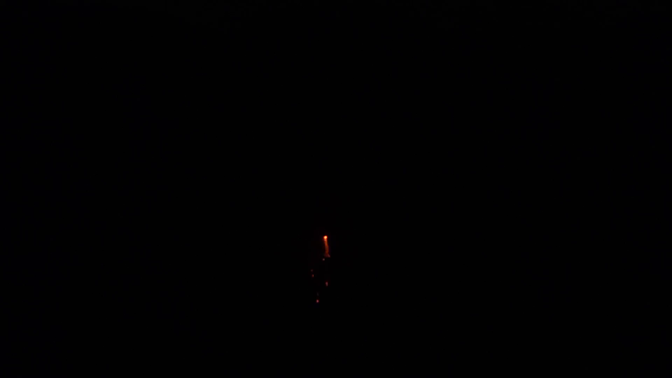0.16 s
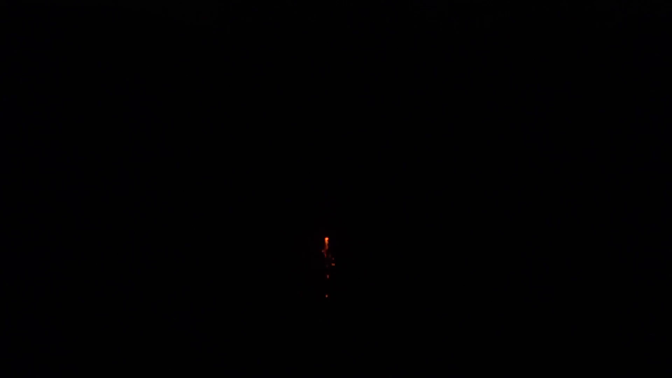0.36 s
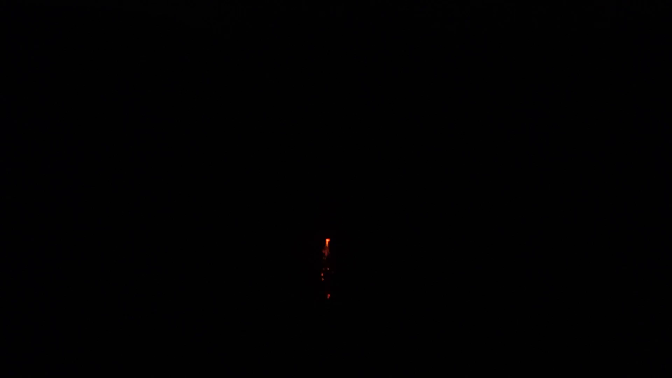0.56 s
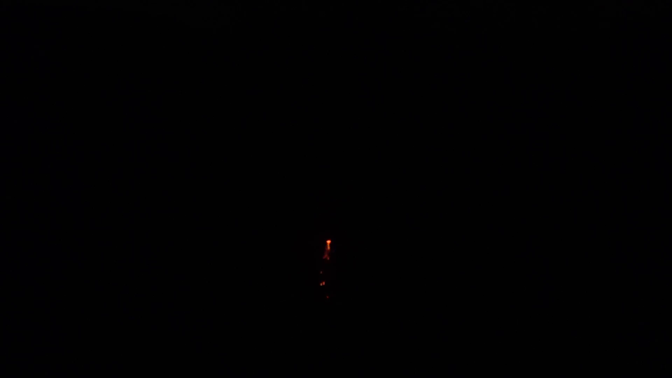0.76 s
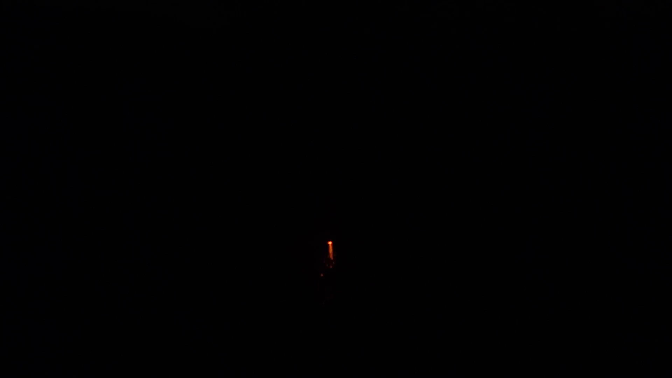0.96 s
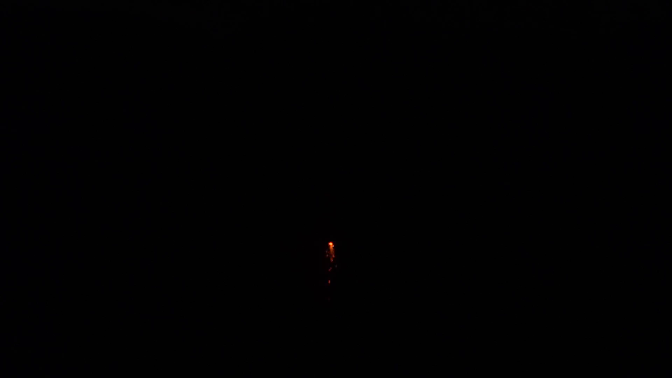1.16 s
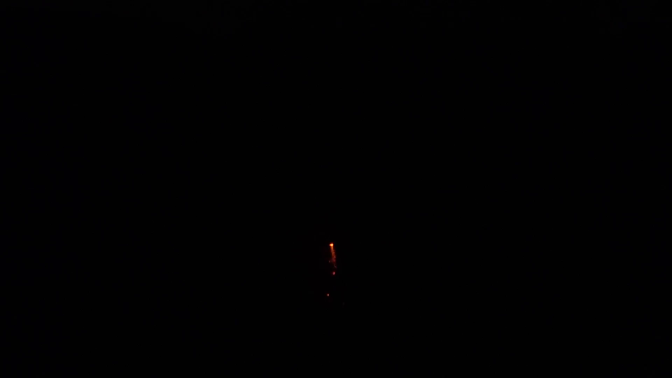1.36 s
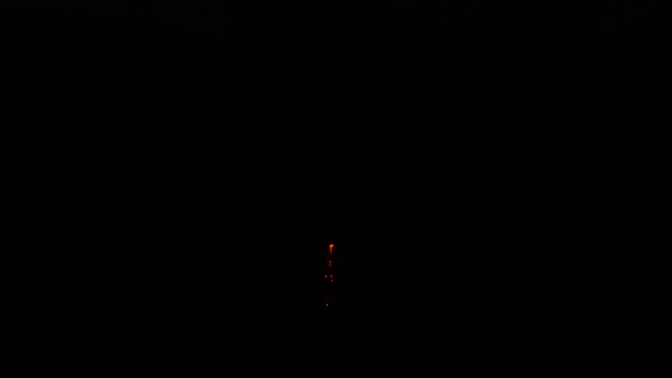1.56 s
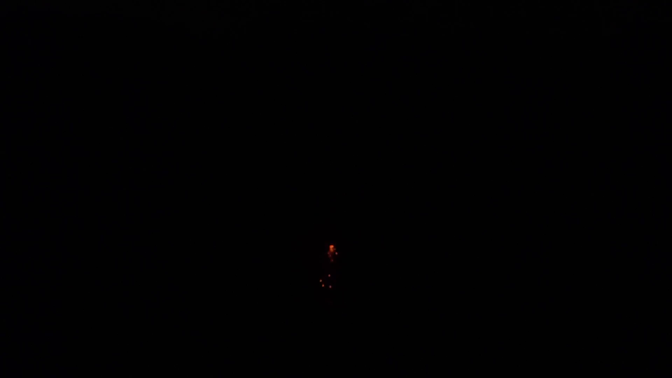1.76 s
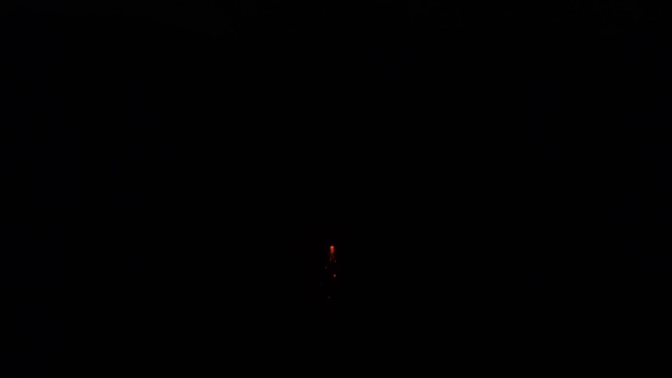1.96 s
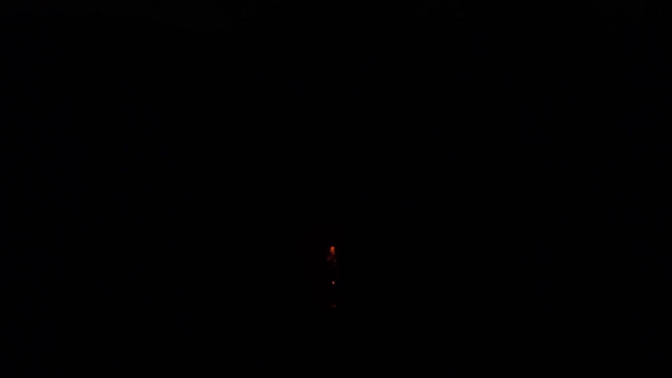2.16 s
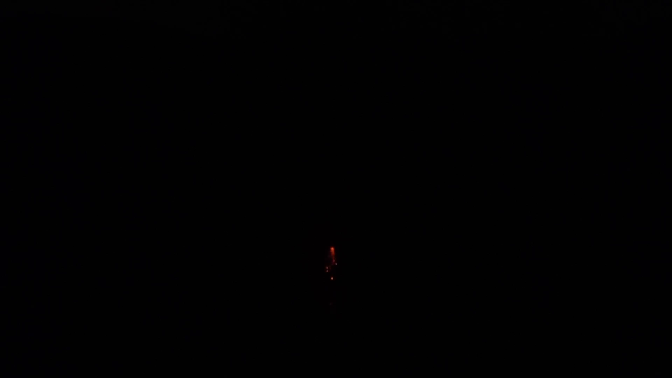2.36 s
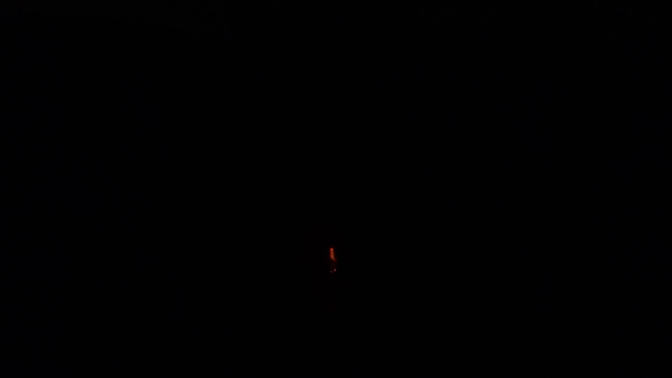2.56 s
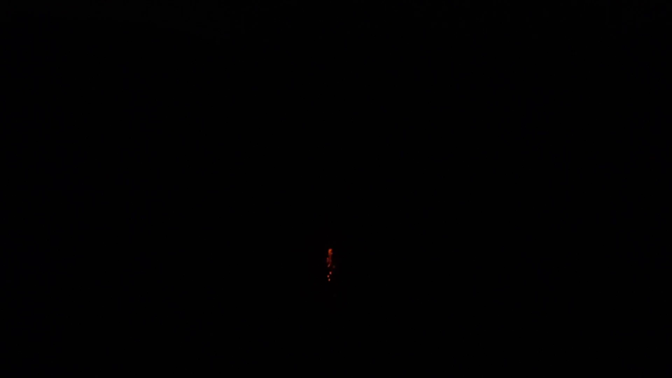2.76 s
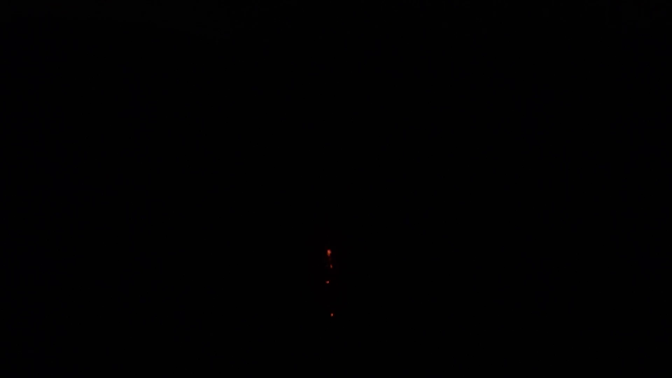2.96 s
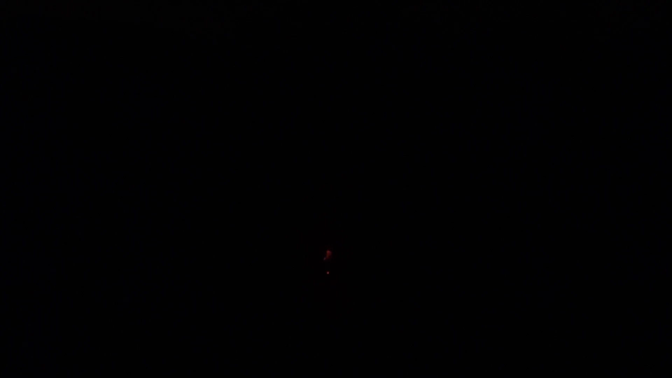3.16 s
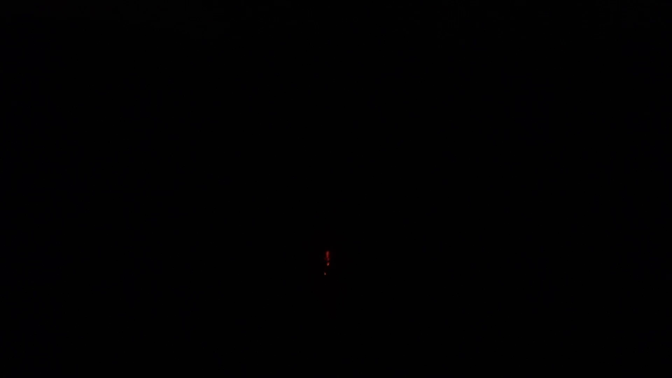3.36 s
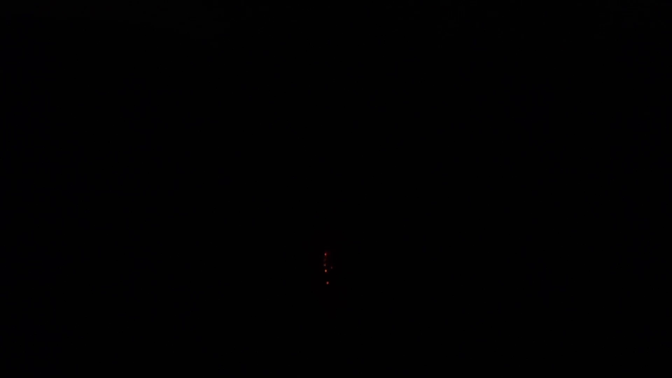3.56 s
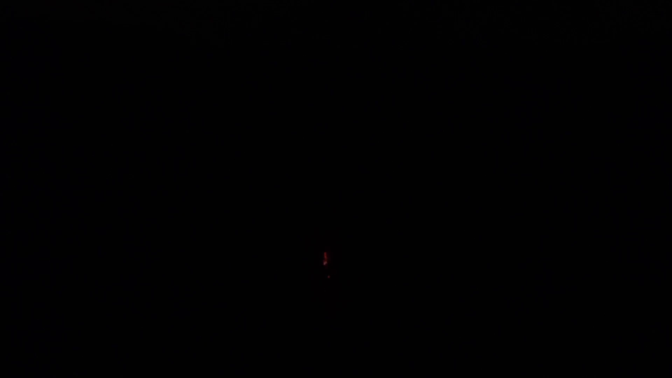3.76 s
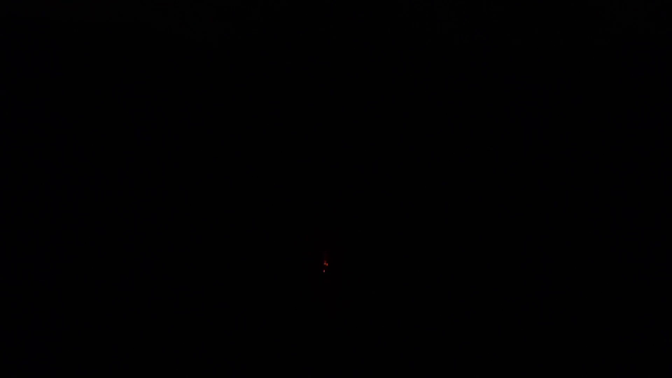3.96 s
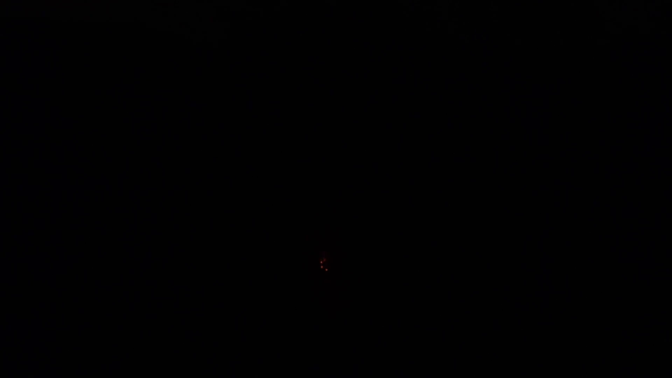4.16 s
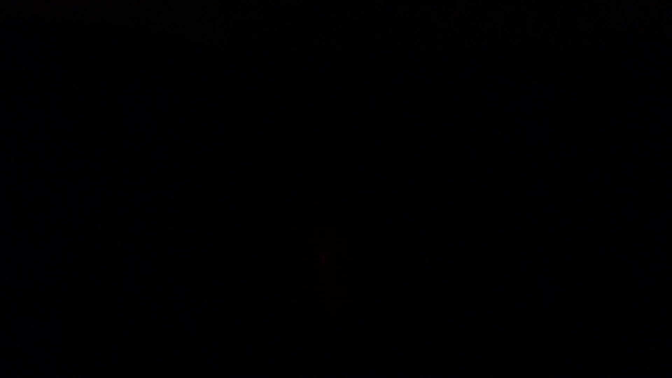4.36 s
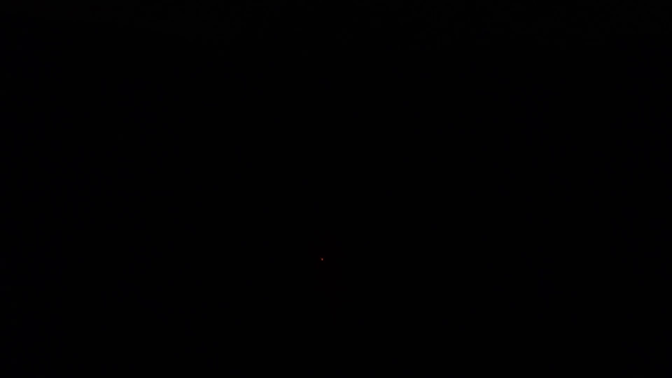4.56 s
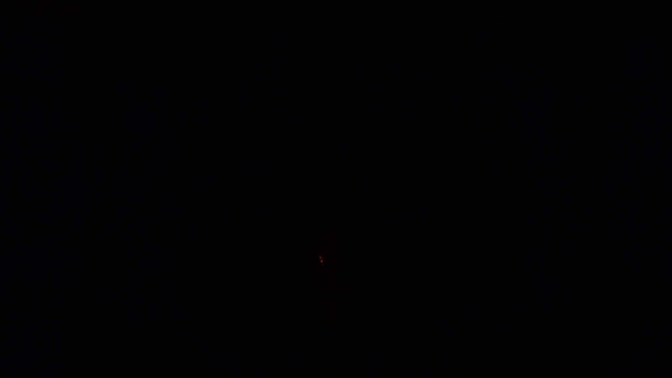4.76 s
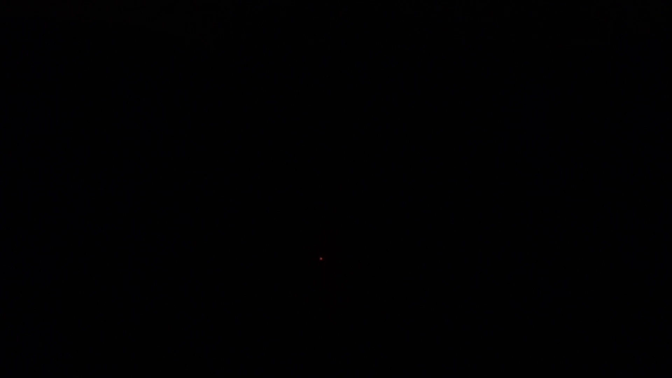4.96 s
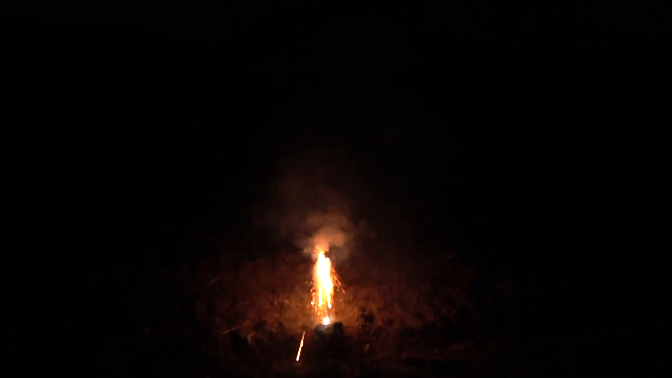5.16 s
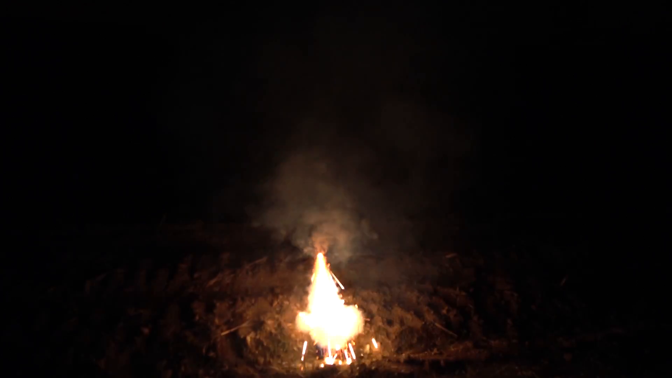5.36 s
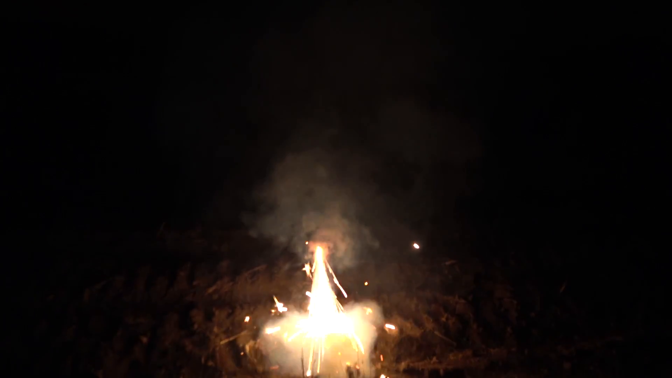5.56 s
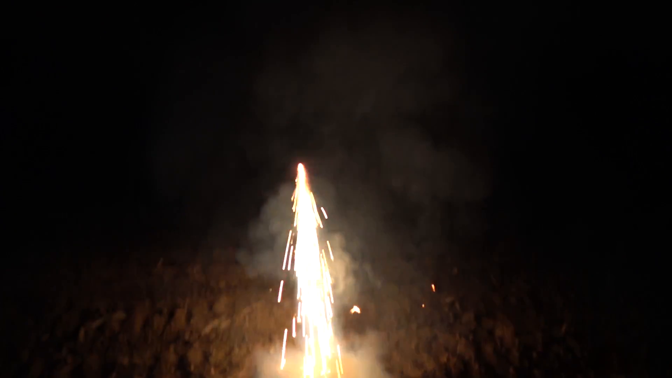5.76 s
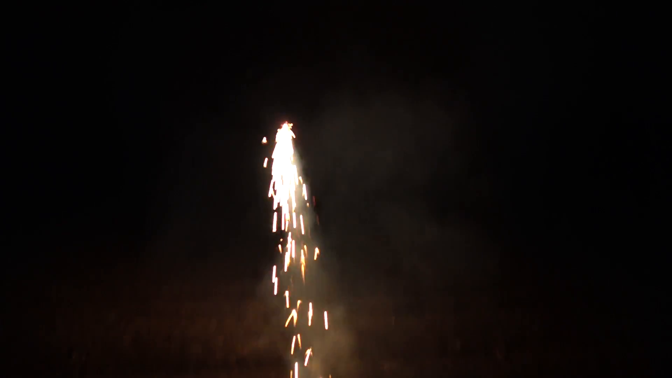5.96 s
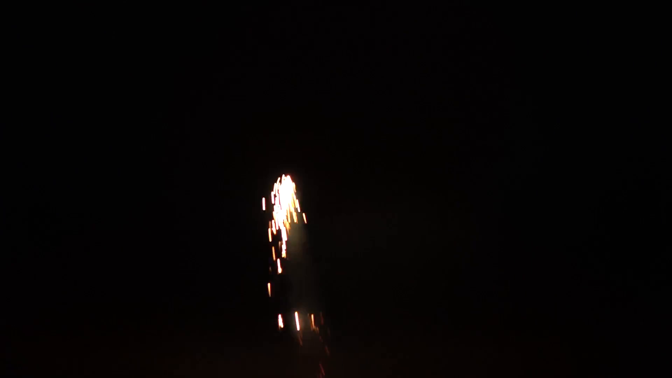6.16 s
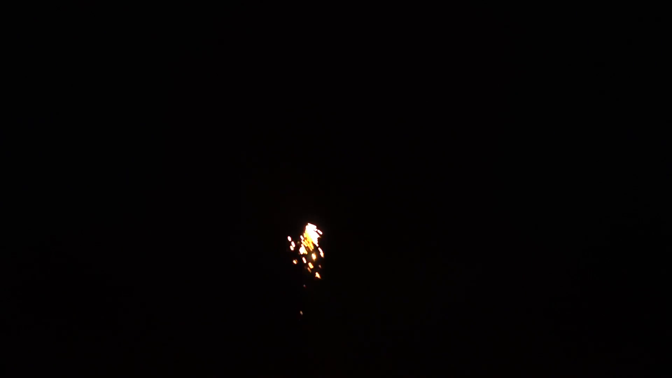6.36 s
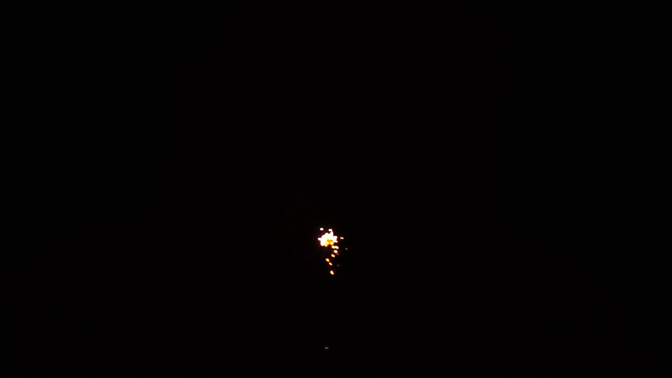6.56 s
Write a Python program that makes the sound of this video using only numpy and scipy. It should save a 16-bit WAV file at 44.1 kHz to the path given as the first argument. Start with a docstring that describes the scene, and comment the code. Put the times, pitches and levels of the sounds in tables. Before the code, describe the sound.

On open ground, almost straight in front of the microphone, a burning fuse gives a quiet, flickering hiss and spits a few times while the air rumbles faintly. Then a whistling rocket ignites with a quick thump and chirp. A short sputter turns into a much louder, piercing whistle that slides down in pitch over a sizzling, rushing jet, its top end dulling as the rocket draws away.

```python
"""A whistling rocket on open ground at night, nearly straight ahead of a stereo microphone.
Its fuse hisses and spits over a low rumble of air; the charge catches with a chirp and a squeal.
Pulsed burning drives the tube: it sputters, then locks into a shrill whistle that sinks as the tube
burns hollow. The rocket climbs away on a roaring jet, its echo off the ground trailing further behind."""
import sys
import numpy as np
from scipy import signal
from scipy.fft import rfft, irfft
from scipy.io import wavfile
from scipy.ndimage import uniform_filter1d

SR = 44100
rng = np.random.default_rng(int(sys.argv[2]) if len(sys.argv) > 2 else 0)


def store_pcm(level_fs):
    """Save levels as 16-bit WAV."""
    pcm = np.round(np.clip(level_fs, -1, 1) * 32767).astype(np.int16)
    wavfile.write(sys.argv[1], SR, np.atleast_2d(pcm).T)


N = 291508
T = np.arange(N) / SR

LAUNCH_S, LOCK_S, SETTLE_S = 5.2524, 5.37, .085  # the sputter starts, locks onto the tube, settles
AWAY_S, AWAY_LENGTH_S = 5.78, 0.33  # the rocket draws away from the microphone
BURST_HZ, BURST_WIDTH_HZ = 6900, 3600  # the crack of flaring powder
# treble in flight, shared by bursts and jet hiss: (time [s], level [dB])
TREBLE = [(5.256, -17.5), (5.275, -22), (5.37, -23), (5.47, -26), (5.58, -25.5), (5.70, -21.5),
          (5.80, -25.5), (5.88, -37), (6.61, -41.5)]


def whistle(tone_db=-0.1, burst_db=-0.66, waver_db=1.6, shimmer_db=3.5):
    """Pulsed burning drives the tube: a fluttering tone, half-pitch partials, bursts and turbulence."""
    # loudness of the tone: (time [s], level [dB])
    whistle_level = [(5.265, -25), (5.321, -30.5), (5.373, -20.5), (5.493, -15), (5.627, -13.5),
                     (5.961, -17), (5.987, -21), (6.035, -17), (6.61, -16)]
    # partials at 1/2, 3/2, ... of the pitch: (level against the half-pitch tone [dB])
    half_partials = [0, -2.5, -21, -10, -15]
    flutter, uneven_db, scatter, share = burning()
    # the period doubles for a while, and the tone is restless as that takes hold
    doubling_s, attack_s = 5.39, 0.1494
    half_db = -12.5 - 21 * (1 - swell(doubling_s, attack_s, end=6.02, release=0.087))
    flutter = flutter + .5 * np.sin(np.pi * ramp(doubling_s, attack_s) ** 2)
    # until it locks, the pitch stumbles from cycle to cycle
    stumble = .075 * (1 - ramp(LOCK_S - SETTLE_S / 2, SETTLE_S / 2)) * drift(260)
    wobble = .027 * flutter * drift(130)
    turns = np.cumsum(tube_pitch() * (1 + wobble + stumble)) / SR
    # the sharper the flares, the more the wave steepens into its octave
    main = tone(turns) + from_db(-21.5) * np.sqrt(share) * tone(2 * turns + 1 / 4)
    half = sum(from_db(half_db + db) * tone((k + .5) * turns) for k, db in enumerate(half_partials))
    level = from_db(in_time(whistle_level) + tone_db + shimmer_db * flutter * drift(180))
    voice = level * (main + over_ground(half, echo=0.2) * from_db(waver_db * drift(30)))
    cracks = bursts(turns, uneven_db, scatter, alternation=np.clip(4 * from_db(half_db), 0, 1))
    cracks *= from_db(in_time(TREBLE) + burst_db) * np.sqrt(share)
    return voice + over_ground(cracks, echo=0.35) + turbulence(turns)


def tube_pitch(lock_hz=2390, hollow_hz=1880, sink_s=.18, sag_hz_per_s=228):
    """High while the charge sputters; once locked, it sinks as the tube hollows and the rocket recedes."""
    sputter_hz = np.interp(T, [LAUNCH_S, LAUNCH_S + .055], [2380, 2670])
    burnt_s = np.maximum(T - LOCK_S, 0)
    tube_hz = hollow_hz + (lock_hz - hollow_hz) * np.exp(-burnt_s / sink_s) - sag_hz_per_s * burnt_s
    recede_m_per_s = 8.7 * ramp(5.72, .21)
    doppler = 1 + recede_m_per_s / 343
    return (sputter_hz + (tube_hz - sputter_hz) * ramp(LOCK_S, .007)) / doppler


def burning():
    """The sputter settles into steady pulsing, which blurs again with distance."""
    # manners of burning: (flutter [0-1], flare unevenness [dB], scatter [cycles], treble share [0-1])
    sputtering = (1.0, 14, .26, .98)
    locked = (.1, 3.0, .014, .8)
    distant = (.36, 5, .26, .13)
    fresh = np.exp(-np.maximum(T - LAUNCH_S, 0) / SETTLE_S)
    away = ramp(AWAY_S, AWAY_LENGTH_S)
    return np.outer(sputtering, fresh) + np.outer(locked, 1 - fresh - away) + np.outer(distant, away)


def bursts(turns, uneven_db, scatter, alternation):
    """The powder flares once a cycle, unevenly, and strong-weak in turn when the period doubles; rms 1."""
    cycle = np.arange(1, int(turns[-1]))
    timing, strength = rng.standard_normal((N // 8, 2))[:len(cycle)].T
    when = np.interp(cycle + scatter[np.searchsorted(turns, cycle)] * timing, turns, np.arange(N))
    at = np.minimum(when.astype(int), N - 2)
    size = from_db(uneven_db[at] * np.minimum(strength, 1)) * (1 + alternation[at] * (-1) ** cycle)
    # each click is split between two neighbouring samples
    clicks = np.bincount(at, size * (1 - when + at), N) + np.bincount(at + 1, size * (when - at), N)
    cracks = resonate(clicks, BURST_HZ, BURST_WIDTH_HZ)
    return cracks / np.sqrt(uniform_filter1d(cracks ** 2, size=1500) + 1e-12)


def turbulence(turns, near_db=-30, far_db=-24.5, air_loss_db=13):
    """Bands of noise ride on the tube's pitch; the air dulls the high ones as the rocket climbs."""
    # turbulence in the tube: (frequency [multiple of pitch], width [Hz], level [dB])
    bands = [(.5, 120, -27), (.86, 163, -4), (.97, 71, -7), (1.27, 570, -10.5), (1.48, 120, -19.5),
             (1.86, 170, -14), (2, 65, -11.5), (2.93, 500, -21), (3.5, 230, -19.5), (3.8, 247, -31),
             (4.56, 240, -22.5), (6.15, 467, -31), (7.1, 850, -26), (8.2, 850, -27)]
    phase, height = 2 * np.pi * turns, ramp(6.0, .6)
    churn = np.zeros(N)
    for multiple, width, db in bands:
        band = drift(width / 2) * np.cos(multiple * phase) + drift(width / 2) * np.sin(multiple * phase)
        churn += from_db(db - air_loss_db * height * (multiple / bands[-1][0]) ** 2) * band
    level = from_db(near_db + (far_db - near_db) * np.sqrt(ramp(AWAY_S, AWAY_LENGTH_S)))
    return level * signal.sosfilt(signal.butter(2, 350, "high", fs=SR, output="sos"), churn)


def exhaust(jet_db=-1.0, rasp_db=-2.5, top_loss_db_per_s=7):
    """The jet hisses, sizzles at lift-off and builds to a roar; distance takes its top away."""
    # spectra of the jet's hiss, sizzle and roar: (frequency [Hz], level [dB])
    jet_colour = [(900, -0.5), (2000, 4), (3000, 2.5), (4000, 0), (5000, -2), (6500, 1), (8500, -4),
                  (10500, -5.5), (12500, -6), (16000, -27)]
    sizzle_colour = [(9000, 5), (11500, -12), (13800, -3), (15200, -3), (16500, -9)]
    roar_colour = [(90, -33), (160, -12), (230, -2), (320, -0.5), (450, 1), (700, 0), (1000, -0.5),
                   (1500, -1.5), (3000, -9)]
    *_, burst_share = burning()
    sizzle_db = -14 + 14.5 * swell(5.43, attack=0.073, end=5.73, release=0.074)
    sizzle_db -= top_loss_db_per_s * np.maximum(T - AWAY_S, 0)
    hiss = from_db(jet_db) * noise(jet_colour) + from_db(sizzle_db) * noise(sizzle_colour)
    roar = (from_db(-56.5) + from_db(-33.5) * ramp(5.3, 0.28) ** 2) * noise(roar_colour)
    hiss *= np.sqrt(1 - burst_share) * from_db(in_time(TREBLE) + rasp_db * drift(750))
    return over_ground(hiss + roar, echo=0.47)


def over_ground(x, echo):
    """The ground echo sweeps a comb through the sound as the rocket climbs."""
    # lag of the ground echo at the microphone: (time [s], delay [s])
    echo_delay = [(5.3, 0.00052), (5.5, 0.00098), (5.76, .0018), (5.92, .00287), (6.03, .0034),
                  (6.2, .00355), (6.61, 0.0034)]
    return x + echo * np.interp(T - in_time(echo_delay), T, x)


def ignition(chirp_s=5.189, from_hz=2400, to_hz=638, fall_s=0.046, squeal_hz=5660):
    """Gas puffs out with a thump and a ragged falling chirp, then the tube's upper mode squeals."""
    # puffs as the charge catches: (peak [s], rush [dB], thump [dB], rise [s], decay [s])
    puffs = [(5.187, -22.5, -36, 0.016, .022), (5.222, -38, -32.5, .014, 0.024),
             (5.252, -16.5, -29, 0.0075, 0.0062)]
    # spectra of a puff's rush and thump: (frequency [Hz], level [dB])
    rush_colour = [(120, -46), (200, -24), (401, -11), (500, -7), (1100, -2), (1270, -8.5), (1840, -3),
                   (3020, -9.5), (3430, -8.5), (16000, -22)]
    thump_colour = [(20, 1), (45, -14), (90, 2.5), (170, 1.5), (300, -8), (600, -25)]
    # the first puff sounds the tube briefly
    chirp_hz = from_hz + (to_hz - from_hz) * ramp(chirp_s - fall_s / 2, fall_s) ** 2
    turns = np.cumsum(chirp_hz * (1 + .07 * drift(524))) / SR
    chirp = from_db(-16.5 + 3 * drift(454)) * (tone(turns) + from_db(-9) * tone(2 * turns))
    chirp *= puff(chirp_s, rise=0.0078, decay=.008)
    rush, thump = noise(rush_colour), noise(thump_colour)
    gas = sum(puff(s, rise, decay) * (from_db(rush_db) * rush + from_db(thump_db) * thump)
              for s, rush_db, thump_db, rise, decay in puffs)
    squeal = from_db(-8.5) * tone(np.cumsum(squeal_hz * (1 + .035 * drift(500))) / SR)
    return gas + chirp + squeal * during(LAUNCH_S, LAUNCH_S + 0.003)


def fuse(flicker_db=0.76, sputter_db=1.0):
    """The flame rushes and its gas hisses in surges, coloured by resonances and close reflections."""
    # spectra of the burning fuse: (frequency [Hz], level [dB])
    flame_colour = [(160, -37), (280, -30), (388, -12), (885, -1.5), (1070, 0.5), (1600, -2.5),
                    (2140, -9.5), (2580, -10.5), (3030, -12), (3290, -14), (3610, -13), (4500, -20),
                    (5850, -28), (9900, -120)]
    hiss_colour = [(2800, -25), (4000, -6), (5500, -2.5), (8000, -4), (9500, -7.5), (11000, -10.5),
                   (13000, -17)]
    fizz_colour = [(8500, -8), (10500, -2.5), (12300, -4), (15000, -3.5), (16500, -12)]
    # richer stretches of powder: (peak [s], rise [s], fall [s], flame [dB], hiss [dB], fizz [dB])
    surges = [(1.41, 1.3, .05, 1.4, 7.8, 6), (1.64, 0.28, 0.6, 2.5, 7.5, 4),
              (2.72, 0.74, 0.3, 2.3, 4.5, 2.5), (3.45, 0.21, 0.21, 2.5, 6, 2.5),
              (3.8, 0.35, 0.17, 1.8, 5, 5.5), (4.5, 0.41, 0.15, 1.3, 3.3, 0),
              (4.93, 0.077, 0.27, 0, 3, 2.5)]
    # narrow resonances in the hiss: (frequency [Hz], width [Hz], relative level [dB])
    modes = [(2360, 450, -5.5), (3270, 87, -1), (6100, 70, -1), (6860, 72, 0), (8220, 570, -2.5),
             (12000, 160, -1)]
    # hard surfaces beside the fuse: (delay [s], relative gain)
    reflections = [(.00119, .2), (.00137, -.1), (.00156, .17), (.00167, -.09)]
    # resonances and reflections grow as the flame creeps along: (time [s], gain)
    exposure_curve = [(0, .7), (1.4, .55), (2.0, .7), (2.3, 1.1), (5.1, 1.15)]
    flame_surge, hiss_surge, fizz_surge = sum(
        np.outer(gains, swell(s - rise, rise, s, fall)) for s, rise, fall, *gains in surges)
    # the fuse grows quieter as it burns in
    hiss = from_db(-49.5 - 2 * T + hiss_surge) * noise(hiss_colour)
    fizz = from_db(-57 - 0.9 * T + fizz_surge) * noise(fizz_colour)
    flame = from_db(-40 - 1.08 * T + flame_surge) * noise(flame_colour)
    gas = flame + from_db(sputter_db * drift(400) + .6 * drift(10)) * (hiss + fizz)
    gas *= from_db(flicker_db * drift(16.6))
    exposure = in_time(exposure_curve)
    direct = gas + exposure * sum(from_db(db) * resonate(gas, hz, width) for hz, width, db in modes)
    echoes = sum(gain * np.interp(T - delay, T, direct) for delay, gain in reflections)
    return (direct + exposure * echoes) * during(0, LAUNCH_S)


def spits(snap=0.18):
    """A grain of powder bursts: a snap and a short hollow pop."""
    # grains in the fuse: (time [s], peak of the pop [dB], pitch [Hz])
    grains = [(.829, -22.5, 500), (1.178, -24.5, 480), (2.174, -21.5, 950)]
    pops = np.zeros(N)
    for s, peak_db, hz in grains:
        click = np.zeros(N)
        click[round(s * SR)] = 1
        pop, crack = resonate(click, hz, hz / 2), resonate(click, BURST_HZ, BURST_WIDTH_HZ)
        pops += from_db(peak_db) * (pop / pop.max() + snap * crack / crack.max())
    return pops


def rumble(lump_db=2.0, deepens_s=3.3):
    """Lumpy low air noise, unequal left and right, that deepens until the rocket fires."""
    # spectra of the deep and the upper air: (frequency [Hz], level [dB])
    deep_colour = [(15, -2.5), (30, 4), (65, -5), (100, -14.5), (160, -21)]
    upper_colour = [(55, -0.5), (100, -2), (165, -5), (230, -1), (290, -12.5), (380, -15)]
    # the rumble sinks under the launch: (time [s], gain [dB])
    fade = [(5.25, 4), (5.3, -30), (5.55, -17), (5.76, -7), (5.96, -48)]
    late_s = np.clip(T, deepens_s, LAUNCH_S) - deepens_s
    deep_db, upper_db = -52.5 + 2 * late_s + lump_db * drift(12), -50.5 - 4.5 * late_s
    deep = from_db(deep_db) * stereo(noise(deep_colour), noise(deep_colour), side_db=-4)
    upper = from_db(upper_db) * stereo(noise(upper_colour), noise(upper_colour), side_db=-8)
    return (panned(deep, pan_db=4) + panned(upper, pan_db=-4.5)) * from_db(in_time(fade))


def from_db(db):
    """Decibels to gain."""
    return 10 ** (np.asarray(db) / 20)


def rms_one(x):
    """Scale to rms 1."""
    return x / np.sqrt(np.mean(x ** 2) + 1e-20)


def in_time(curve):
    """A (time, value) curve at every sample."""
    return np.interp(T, *np.transpose(curve))


def during(start, end, fade=0.00082):
    """1 between two moments, fading outside them."""
    return np.clip(1 + np.minimum(T - start, end - T) / fade, 0, 1)


def ramp(start, length):
    """Rises from 0 to 1 in a given time."""
    return np.clip((T - start) / length, 0, 1)


def swell(start, attack, end, release):
    """Attack, hold and release, between 0 and 1."""
    return ramp(start, attack) * (1 - ramp(end, release))


def puff(peak, rise, decay):
    """Grows exponentially to 1, then dies away; rise and decay are time constants."""
    return np.exp(-np.minimum(np.maximum((peak - T) / rise, (T - peak) / decay), 20))


def noise(colour):
    """Noise with a given spectrum, falling 36 dB an octave beyond its ends; rms 1."""
    hz, level_db = np.transpose(colour)
    octave, known = np.log2(np.maximum(np.fft.rfftfreq(N, 1 / SR), 1)), np.log2(hz)
    beyond = np.abs(octave - np.clip(octave, known[0], known[-1]))
    gain = from_db(np.interp(octave, known, level_db) - 36 * beyond)
    return rms_one(irfft(rfft(rng.standard_normal(N)) * gain, N))


def drift(rate):
    """Smooth chance changing about rate times a second; spread 1."""
    smooth = signal.butter(2, np.clip(rate, 1, SR / 4), fs=SR, output="sos")
    return rms_one(signal.sosfilt(smooth, rng.standard_normal(N + SR))[SR:])


def resonate(x, hz, width_hz):
    """A resonance with gain 1 at its peak."""
    r = np.exp(-np.pi * width_hz / SR)
    feedback = [1, -2 * r * np.cos(2 * np.pi * hz / SR), r * r]
    return signal.lfilter(np.array([1, 0, -1]) * (1 - r * r) / 2, feedback, x + 1e-18)


def tone(turns):
    """A sine of rms 1 at a phase counted in cycles."""
    return np.sqrt(2) * np.sin(2 * np.pi * turns)


def stereo(mid, side, side_db):
    """Left and right from a shared part and a weaker opposed part."""
    return mid + from_db(side_db) * side * np.array([[1], [-1]])


def panned(x, pan_db):
    """Tilt a stereo pair, left minus right in dB."""
    return x * from_db([[pan_db / 2], [-pan_db / 2]])


def scene():
    """Fuse, ignition and flight ahead of the microphone; the bursts spread wider than the tone."""
    waiting = stereo(fuse() + spits(), fuse(), side_db=-11.5)
    flight = stereo(whistle(), whistle(tone_db=-4, burst_db=1.3), side_db=-17)
    flight += stereo(exhaust(), exhaust(), side_db=-24.5)
    return rumble() + waiting + ignition() + flight * during(LAUNCH_S, T[-1])


def record(dry, ceiling=0.36, cutoff_hz=16500):
    """The loudest peaks are squashed and the top is cut."""
    squashed = dry / (1 + (dry / ceiling) ** 6) ** (1 / 6)
    return signal.sosfilt(signal.ellip(12, .1, 90, cutoff_hz, fs=SR, output="sos"), squashed)


dry = scene()
out = record(dry)
store_pcm(out)
```